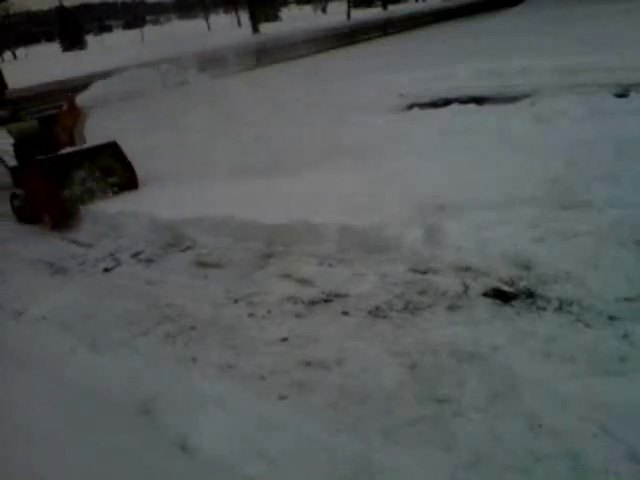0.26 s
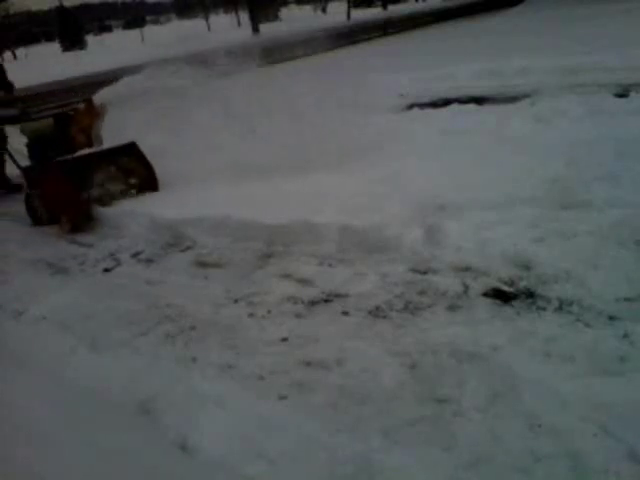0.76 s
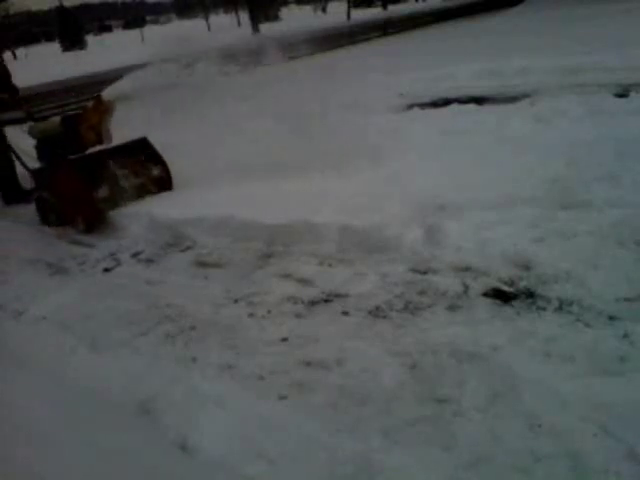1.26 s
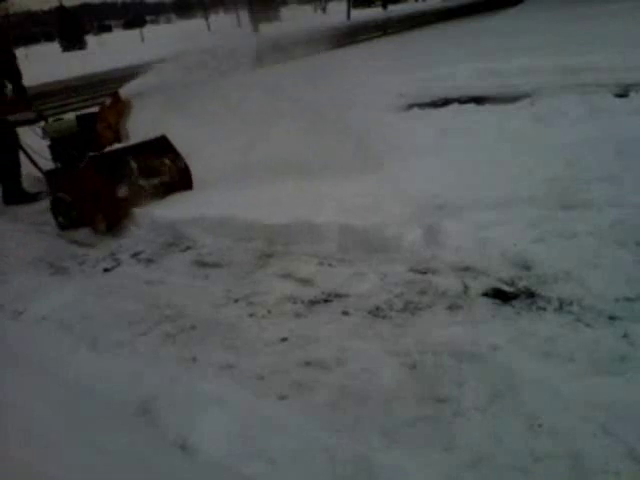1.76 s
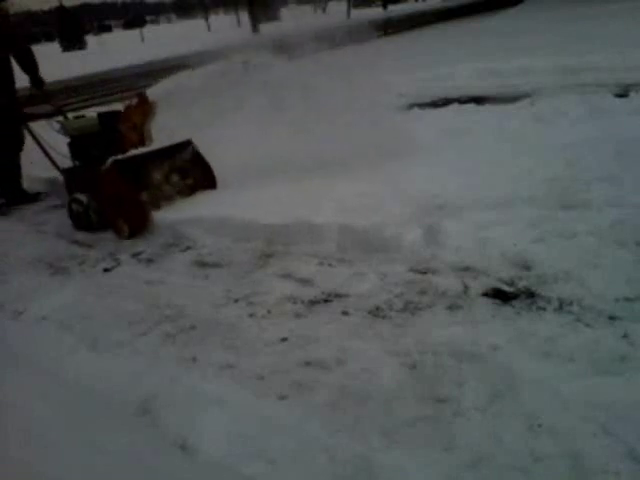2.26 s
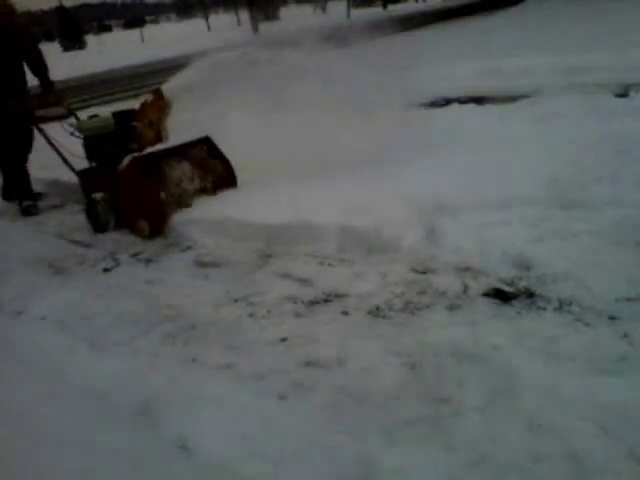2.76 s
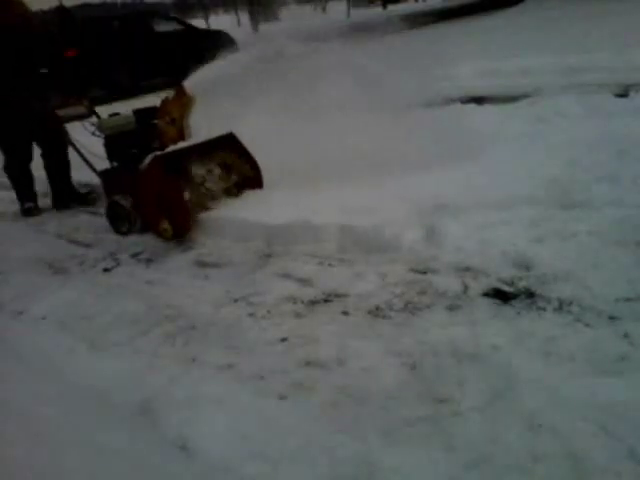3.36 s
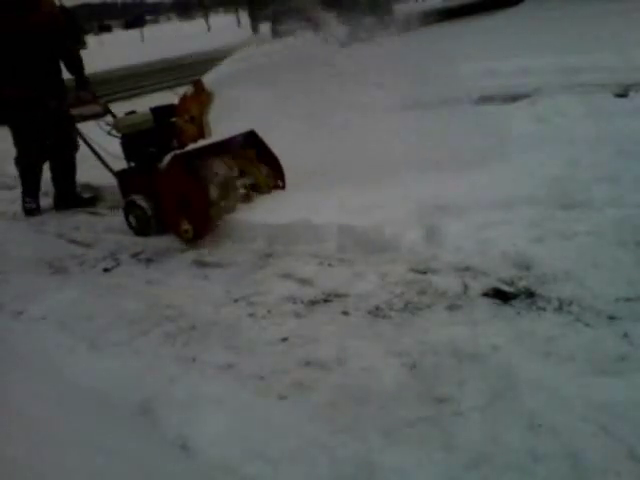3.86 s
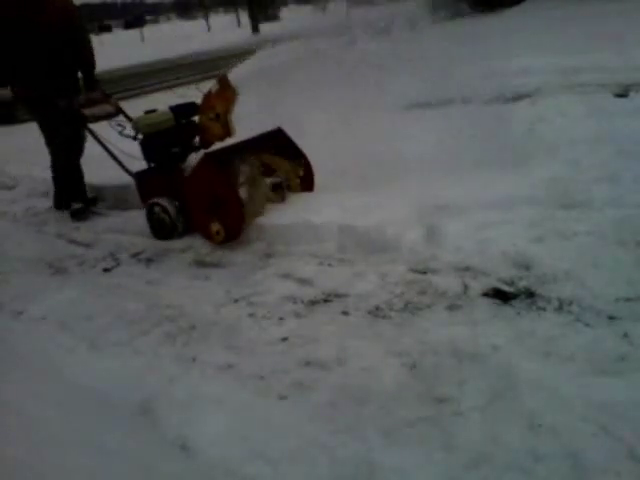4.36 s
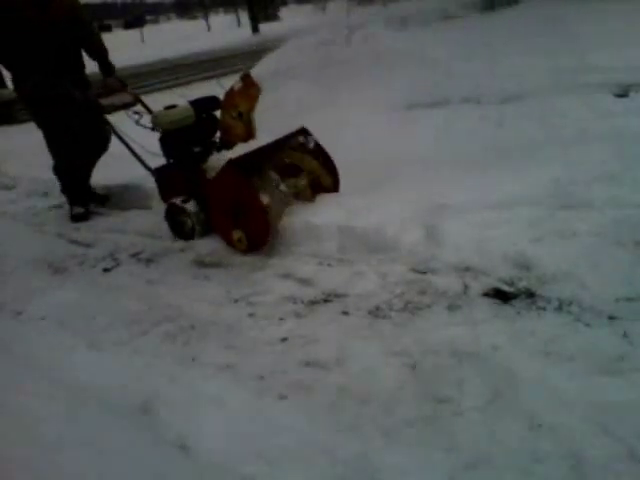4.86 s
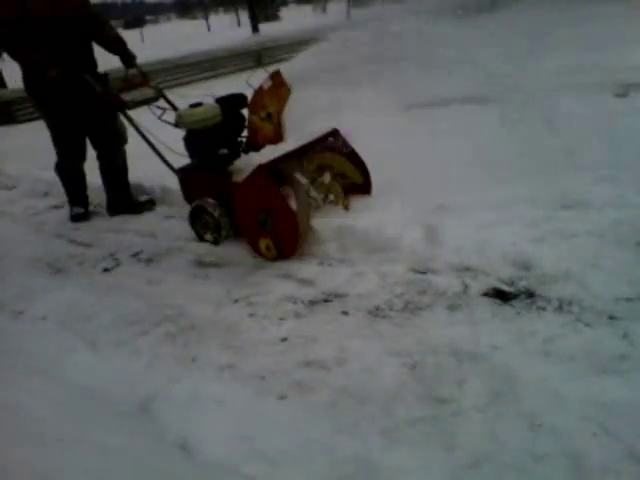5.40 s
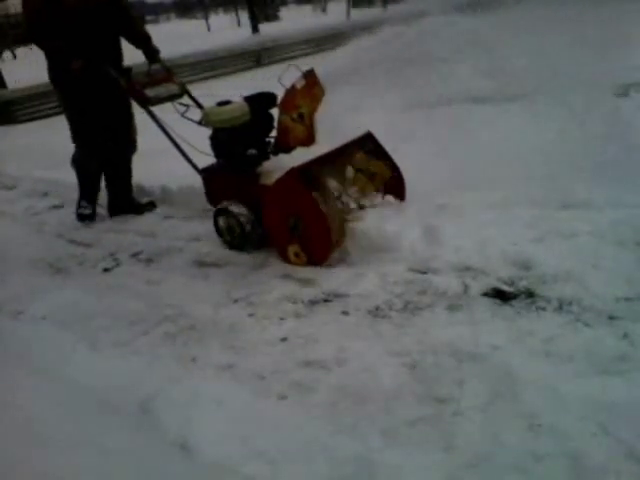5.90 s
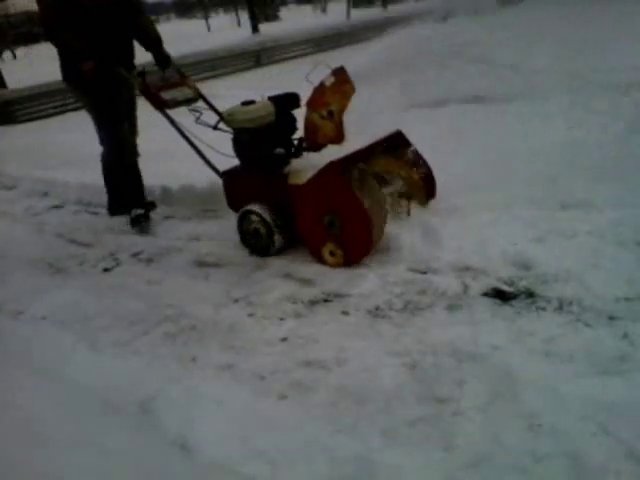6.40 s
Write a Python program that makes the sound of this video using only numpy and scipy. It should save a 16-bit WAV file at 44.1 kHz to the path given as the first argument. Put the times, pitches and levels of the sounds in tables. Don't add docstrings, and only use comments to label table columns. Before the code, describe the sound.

Steady popping engine hum and whine of a nearing snow thrower, icy lumps knocking in the metal auger, occasional bright clicks, dull muffled treble.

```python
import sys
import numpy as np
from scipy import signal
from scipy.fft import rfft, irfft
from scipy.io import wavfile
from scipy.ndimage import uniform_filter1d

SR = 44100
rng = np.random.default_rng(int(sys.argv[2]) if len(sys.argv) > 2 else 0)


def field_ratio(decibels):
    return 10 ** (np.asarray(decibels, dtype=float) / 20)


def bounce(signal):
    frames = np.transpose(np.atleast_2d(signal))
    limited = np.clip(frames, -1, 1)
    pcm = np.round(limited * 32767).astype(np.int16)
    wavfile.write(sys.argv[1], SR, pcm)


N = 292824


def rms_one(x):
    return x / np.sqrt(np.mean(x ** 2) + 1e-20)


def in_time(rows):
    s, *columns = np.transpose(rows)
    return [np.interp(np.arange(N) / SR, s, column) for column in columns]


def drift(rate):
    hop = 40
    r = np.exp(-2 * np.pi * hop * rate / SR)
    coarse = rng.standard_normal(N // hop + 2002)
    slow = signal.lfilter([1], [1, -2 * r, r * r], coarse)[2000:]
    return np.interp(np.arange(N) / hop, np.arange(len(slow)), rms_one(slow))


def filtered(x, order, hz, kind):
    return signal.sosfilt(signal.butter(order, hz, kind, fs=SR, output="sos"), x)


def resonate(x, hz, width_hz):
    r = np.exp(-np.pi * width_hz / SR)
    poles = [1, -2 * r * np.cos(2 * np.pi * hz / SR), r * r]
    return signal.lfilter(np.array([1, 0, -1]) * (1 - r * r) / 2, poles, x)


def body(modes, envelope, patchy_db, rate):
    out, power = np.zeros(N), 0
    for hz, width_hz, db in modes:
        shaking = envelope * field_ratio(patchy_db * drift(rate)) * rng.standard_normal(N)
        out += field_ratio(db) * resonate(shaking, hz, width_hz)
        power += field_ratio(db) ** 2 * np.pi * width_hz / SR
    return out / np.sqrt(power)


def bursts(times, levels_db, t60s):
    rise_s = .002
    out = np.zeros(N)
    for s, level_db, t60 in zip(times, levels_db, t60s):
        at = round(s * SR)
        t = np.arange(min(N - at, SR // 4)) / SR
        out[at:at + len(t)] += field_ratio(level_db - 60 * t / max(t60, .01)) * np.minimum(t / rise_s, 1)
    return out


def rings(rows, t60, rise_s):
    out, t = np.zeros(N), np.arange(SR // 10) / SR
    for s, peak_db, hz in rows:
        at = round(s * SR)
        note = field_ratio(peak_db - 60 * t / t60) * np.minimum(t / rise_s, 1) * np.sin(2 * np.pi * hz * t)
        out[at:at + len(t)] += note[:N - at]
    return out


def once_a_cycle(cycle, place, spread_db):
    marks = np.diff(np.floor(cycle - place), prepend=-1.) > 0
    return marks * field_ratio(spread_db * rng.standard_normal(N))


def wavering(turns, level_db, waver_db=2.06, waver_rad=.2, rate=4):
    phase = 2 * np.pi * turns + waver_rad * drift(rate)
    return field_ratio(level_db + 3.5 + waver_db * drift(rate)) * np.sin(phase)


def exhaust(cycle, pop_db):
    pops = -once_a_cycle(cycle, place=.615, spread_db=3.0)
    muffler = resonate(resonate(pops, 460, 160), 425, 370)
    return field_ratio(pop_db + 0.5) * rms_one(muffler)


def hum(cycle, pop_db):
    order_db = [-49.5, -39.5, -43.5, -42, -39, -43, -44]
    blade_db = [-45, -45]
    whine_orders = [16, 19, 23, 24, 26, 34]
    whine_db = [-7, -14, -12.5, -5.5, -7, -20.5]
    blades_per_cycle, blade_lead = 2.204, .1
    start = rng.random(len(order_db))
    orders = sum(wavering((k + 1) * cycle + start[k], db) for k, db in enumerate(order_db))
    blades = sum(wavering((k + 1) * blades_per_cycle * cycle + start[1] + blade_lead, db)
                 for k, db in enumerate(blade_db))
    whine = sum(wavering(k * cycle + rng.random(), db, waver_db=5.5, waver_rad=1.6, rate=11)
                for k, db in zip(whine_orders, whine_db))
    return orders + blades + field_ratio(pop_db) * whine


def metal(cycle, hiss_db):
    # mode_hz [Hz], width_hz [Hz], level_db [dB]
    metal_modes = [(2932, 47, -2.5), (3420, 200, -41.5), (4110, 180, -10.5), (4240, 420, 2), (4394, 330, 1),
                   (5630, 220, -2.5), (6640, 560, -1.5)]
    fall = np.exp(-1 / (0.0034 * SR))
    taps = once_a_cycle(cycle, place=.37, spread_db=1.0)
    puffs = 1 + 1.4 * signal.lfilter([1], [1, -fall], taps)
    slide = field_ratio(hiss_db - 0.5 + 0.74 * drift(14.0))
    hiss = body(metal_modes, slide * puffs, patchy_db=0.5, rate=6)
    ticks = resonate(resonate(taps, 4383, 290), 4590, 820)
    return hiss + field_ratio(hiss_db - 10) * rms_one(ticks)


def housing(cycle, housing_db):
    # mode_hz [Hz], width_hz [Hz], level_db [dB]
    housing_modes = [(522, 64, -6.5), (687, 130, -4.5), (766, 102, -1), (914.4, 43, 1.5), (983, 63, -4),
                     (1077, 36, -0.5), (1310, 560, -31), (1664, 117, -13.5)]
    # start_s [s], peak_db [dB], pitch_hz [Hz]
    knocks = [(0.331, -9, 870), (0.356, -8.5, 700), (0.578, -18, 750), (1.014, -7.5, 860),
              (1.114, -17, 960), (1.273, -5.5, 754), (1.692, -8, 770), (3.102, -12, 710), (3.605, -14, 755),
              (3.732, -5, 772), (4.178, -9, 684), (4.302, -12.5, 740), (4.553, -5, 764), (4.591, -7, 764),
              (4.776, -9, 480), (4.941, -7, 745), (5.044, -6.5, 790), (5.118, -3, 826), (5.133, -2.5, 754),
              (5.192, -8, 700), (5.213, -13, 960), (5.47, -5.5, 855), (5.917, -9.5, 790), (6.046, -13, 880),
              (6.138, -4, 830), (6.164, -5, 725), (6.331, -9.5, 1070), (6.412, -11, 905), (6.455, -5, 470),
              (6.511, -6, 760)]
    throb = field_ratio(1.1 * np.cos(2 * np.pi * (cycle - .42)) + 2.08 * drift(38))
    rattle = body(housing_modes, field_ratio(housing_db) * throb, patchy_db=1.0, rate=7.4)
    return rattle + field_ratio(-3.0) * rings(knocks, t60=0.028, rise_s=0.0027)


def drum(rumble_db):
    # mode_hz [Hz], width_hz [Hz], level_db [dB]
    drum_modes = [(130, 29.5, 0), (191, 52, 0), (240, 67, 0), (290, 57, -9.5), (370, 29, -11)]
    # start_s [s], peak_db [dB], pitch_hz [Hz]
    thumps = [(0.273, -15, 148), (0.397, -11.5, 225), (0.477, -32, 196), (0.6, -15.5, 290),
              (0.796, -32, 167), (0.925, -8.5, 280), (1.27, -16, 298), (1.69, -15, 333), (1.395, -19, 213),
              (1.867, -16, 195), (2.021, -17, 160), (2.122, -16, 242), (2.178, -16, 261), (2.472, -14, 260),
              (2.572, -12, 138), (2.885, -26, 240), (3.523, -6, 134), (4.055, -22, 250), (4.546, -8.5, 240),
              (4.783, -11, 236), (4.846, -8, 134), (4.898, -6.5, 227), (4.976, -27, 134),
              (5.602, -9.5, 144), (5.973, -11.5, 188)]
    rumble = body(drum_modes, field_ratio(rumble_db - 1.0), patchy_db=3.0, rate=7.7)
    churn = filtered(rumble, 4, 120, "high")
    return churn + field_ratio(-1.0) * rings(thumps, t60=0.068, rise_s=0.011)


def grit():
    # start_s [s], peak_db [dB], t60_s [s]
    grains = [(0.0054, 3, 0.034), (0.0224, -14.5, 0.15), (0.0683, -7, 0.033), (0.6087, -16, 0.16),
              (0.617, -9, 0.11), (0.6414, -15, 0.15), (0.6906, -11, 0.063), (0.7587, -9.5, 0.043),
              (0.7762, -5.5, 0.08), (0.8014, -10, 0.045), (0.8135, -5.5, 0.087), (0.9188, -19, 0.076),
              (1.251, -16, 0.094), (1.269, -17, 0.064), (1.349, -15.5, 0.1), (1.3965, -21, 0.08),
              (1.7544, -26.5, 0.54), (2.379, -21, 0.1), (2.404, -18, 0.12), (2.878, -12, 0.21),
              (2.8895, -3, 0.07), (2.933, -6, 0.098), (3.951, -10.5, 0.13), (3.9568, -5, 0.086),
              (3.99, -24, 0.099), (4.2395, -14.5, 0.061), (5.9978, -14, 0.062), (6.0397, -19.5, 0.13),
              (6.0994, -20, 0.05), (6.511, -20, 0.04)]
    # mode_hz [Hz], width_hz [Hz], level_db [dB]
    crackle_modes = [(2260, 500, -9.5), (2800, 99, -15.5), (3470, 640, -5.5), (3830, 290, 0),
                     (4280, 180, 4), (4800, 570, -3), (5600, 730, -8.5), (5340, 510, -13.5), (6630, 920, 0)]
    # mode_hz [Hz], width_hz [Hz], level_db [dB]
    chute_modes = [(396, 440, -7.5), (764, 67, -1), (1010, 92, -1.5), (1180, 120, -6.5), (1690, 110, -11.5),
                   (1830, 340, -13)]
    # start_s [s], peak_db [dB]
    slaps = [(0.0054, -17), (0.7603, -17), (0.801, -25), (0.9185, -23), (1.02, -22.5), (1.27, -12),
             (1.2985, -22), (0.019, -20.5), (1.396, -24.5), (1.681, -19.5), (1.6945, -14.5), (1.7552, -18),
             (2.379, -21.5), (2.893, -19), (2.9434, -24), (3.9525, -21.5), (3.99, -26)]
    # start_s [s], peak_db [dB]
    pings = [
        (0.0054, -21),
        (0.6903, -24),
        (0.703, -27),
        (0.813, -28),
        (2.88, -25),
        (2.933, -21),
        (2.9434, -13.5),
        (6.0397, -34),
    ]
    s, peak_db, t60 = np.transpose(grains)
    skitter = field_ratio(2.0 * drift(120) + 2.9 * drift(500))
    crack = body(crackle_modes, skitter * bursts(s, peak_db - 11.0, t60), patchy_db=1.34, rate=18)
    shake = bursts(s, peak_db - 17, t60) + bursts(*np.transpose(slaps), [0.068] * len(slaps))
    plate = body(chute_modes, field_ratio(-1.0) * shake, patchy_db=2.0, rate=27)
    plate = filtered(plate, 2, 2200, "low")
    strikes = field_ratio(20.5) * bursts(*np.transpose(pings), [0.061] * len(pings))
    return crack + plate + resonate(strikes * rng.standard_normal(N), 2930, 90)


def bed(level_db):
    # pitch_hz [Hz], level_db [dB per Hz]
    bed_colour = [(30, -32), (250, 9.5), (600, 2.5), (1100, 5.5), (1600, -8.5), (2000, -5.5), (2500, -45.5),
                  (7000, -21)]
    corner_hz, corner_db = np.transpose(bed_colour)
    hz = np.maximum(np.fft.rfftfreq(N, 1 / SR), 1)
    colour = field_ratio(np.interp(np.log(hz), np.log(corner_hz), corner_db))
    return field_ratio(level_db) * rms_one(irfft(rfft(rng.standard_normal(N)) * colour, N))


def wind():
    # time_s [s], level_db [dB]
    wind_level = [(0.0, -62), (0.5, -63), (1.3, -60), (2.6, -60), (3.1, -56), (3.66, -54), (4.3, -61),
                  (6.64, -66)]
    buffet = filtered(rng.standard_normal(N), 2, [18, 110], "band")
    return field_ratio(in_time(wind_level)[0] + 18 + 3 * drift(5.3)) * rms_one(buffet)


def scene():
    # time_s [s], firing_rate [cycles per s]
    engine_speed = [(0.0, 32.525), (0.474, 31.724), (0.949, 31.675), (1.423, 31.767), (1.897, 31.654),
                    (2.371, 31.777), (2.846, 31.569), (3.32, 31.68), (3.794, 31.549), (4.269, 31.886),
                    (4.743, 31.571), (5.217, 31.948), (5.691, 31.6), (6.166, 31.692), (6.64, 31.62)]
    # time_s [s], nearness_db [dB], bite_db [dB]
    approach = [(0.0, -3, -3.5), (0.3, -3, 2), (0.42, -9.5, 0), (0.68, -1, -3.5), (1.05, -5.5, 2),
                (1.25, -6, 1.5), (1.52, -8, -2), (1.87, -5, 3), (2.22, -5.5, -3), (2.42, -2.5, 0.5),
                (2.7, -3.5, -2.5), (3.0, -1.5, -0.5), (3.7, 0.5, -1), (4.5, 1, -0.5), (5.0, 1.5, 0),
                (5.5, 2, 2.5), (6.1, 2.5, 2.5), (6.64, 3, -0.5)]
    # level_db [dB], nearness_share [ratio], bite_share [ratio]
    parts = [
        (-31, 0.25, 0.24),
        (-31, 0.54, 1),
        (-36.5, 0.82, -0.21),
        (-36, 1.35, -0.15),
    ]
    cycle = -.219 + np.cumsum(in_time(engine_speed)[0]) / SR
    near_db, bite_db = in_time(approach)
    rumble_db, housing_db, hiss_db, pop_db = (
        db + near * near_db + bite * bite_db for db, near, bite in parts)
    engine = exhaust(cycle, pop_db) + hum(cycle, pop_db)
    surge_db = 1.67 * drift(3.36)
    snow = metal(cycle, hiss_db) + housing(cycle, housing_db + surge_db) + drum(rumble_db + surge_db)
    background = bed(.5 * (rumble_db + housing_db) - 2) + wind()
    return (engine + snow + grit() + background)[None]


def mirror_band(kept, fold_hz):
    flashes = [.692, .764, .816, 1.351, 2.883, 4.241, 6.0, 6.041, 6.102, 6.352, 6.513]
    t = np.arange(N) / SR
    mirrored = kept * np.cos(4 * np.pi * fold_hz * t)
    steep = signal.ellip(8, .5, 70, [9120, 9720], "band", fs=SR, output="sos")
    skirt = filtered(mirrored, 4, [8650, 9100], "band")
    mirror = signal.sosfilt(steep, mirrored) + skirt * np.clip(.5 + 2 * drift(6.9), 0, 1)
    mirror = mirror / (1 + np.sqrt(uniform_filter1d(mirror ** 2, size=500)) / 0.015)
    mirror = mirror * field_ratio(-1.5 + 3.3 * drift(9.5))
    gap_db = sum(-28 * np.exp(-((t - s) / .016) ** 4) for s in flashes)
    flash_db = sum(42 * np.exp(-((t - s) / .0035) ** 2) for s in flashes)
    return mirror * field_ratio(gap_db + flash_db)


def fold_sliver(x, fold_hz):
    # start_s [s], end_s [s]
    sliver_spells = [(0, 0.15), (.36, 0.46), (.635, 0.675), (.82, 1.1), (1.21, 1.24), (1.35, 1.47),
                     (1.7, 1.83), (2.33, 2.44), (2.81, 3.24), (3.5, 3.6), (3.96, 4.15), (4.23, 4.35),
                     (4.54, 4.6), (4.8, 5.13), (5.32, 5.65), (5.86, 5.98), (6.02, 6.045), (6.085, 6.105),
                     (6.45, 6.6)]
    t = np.arange(N) / SR
    spells = uniform_filter1d(sum(1. * (t > a) * (t < b) for a, b in sliver_spells), size=900)
    beat = np.cos(np.pi * (t / .064 - .22)) ** 8
    flicker = field_ratio(-14 + 4.4 * drift(40) + 14.2 * beat) * spells * x
    return filtered(flicker, 3, [fold_hz - 70, fold_hz + 50], "band")


def starve(x):
    hz, _, z = signal.stft(x, SR, nperseg=4096)
    narrow = uniform_filter1d(np.abs(z) ** 2 + 1e-14, size=8, axis=0)
    narrow = uniform_filter1d(narrow, size=2, axis=1)
    below_db = 10 * np.log10(narrow / uniform_filter1d(narrow, size=80, axis=0))
    luck = rng.standard_normal((len(hz) // 6 + 1, z.shape[1]))
    luck = uniform_filter1d(np.repeat(luck, 6, axis=0)[:len(hz)], size=3, axis=1)
    need_db = np.interp(hz, [1900, 2100, 7400, 8600], [-60, -7.5, -7.5, -4])
    keep = np.clip((below_db + 8 * luck - need_db[:, None]) / 2, .02, 1)
    return signal.istft(z * keep, SR, nperseg=4096)[1][:N]


def drop_out(x):
    # crack_s [s], length_s [s], depth_db [dB]
    dropouts = [
        (.611, .014, -20),
        (.760, .016, -16),
        (2.878, .036, -24),
    ]
    t = np.arange(N) / SR
    treble = signal.sosfiltfilt(signal.butter(4, 1800, "high", fs=SR, output="sos"), x)
    spared = signal.sosfiltfilt(signal.butter(4, [3900, 5600], "band", fs=SR, output="sos"), x)
    duck_db = sum(db * np.clip(1 - (s - t) / length, 0, 1) ** .5 * (t < s) for s, length, db in dropouts)
    return x - (1 - field_ratio(uniform_filter1d(duck_db, size=60))) * (treble - .6 * spared)


def low_pass(x):
    return signal.sosfilt(signal.butter(12, 9840, fs=SR, output="sos"), x)


def record(dry):
    # dip_hz [Hz], width_hz [Hz], depth [0-1]
    mic_dips = [(2377, 750, 0.53), (3480, 620, 0.27), (4017, 50, 1), (7135, 980, 0.61)]
    fold_hz = 8000
    x = .8 * np.tanh(dry[0] / .8)
    for hz, width_hz, depth in mic_dips:
        x = x - min(depth, 1) * resonate(x, hz, width_hz)
    kept = signal.sosfilt(signal.ellip(14, .5, 90, 7230, fs=SR, output="sos"), x)
    thinned = drop_out(starve(kept + field_ratio(-11.5) * mirror_band(kept, fold_hz)))
    mix = thinned + fold_sliver(x, fold_hz) + .003
    return low_pass(mix[None])


dry = scene()
out = record(dry)
bounce(out)
```